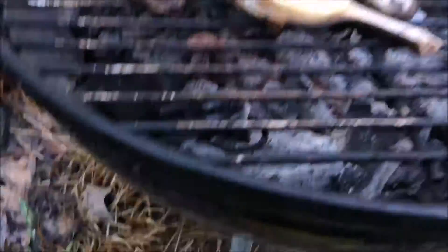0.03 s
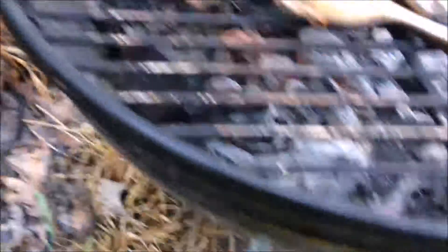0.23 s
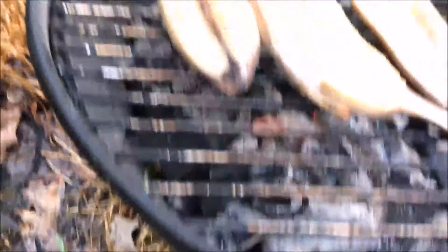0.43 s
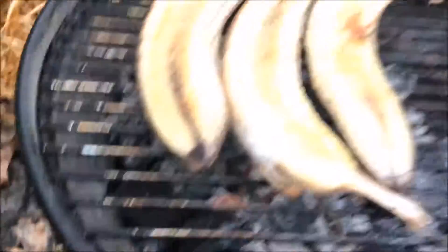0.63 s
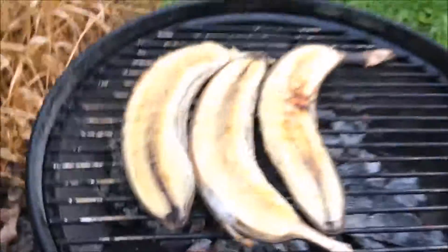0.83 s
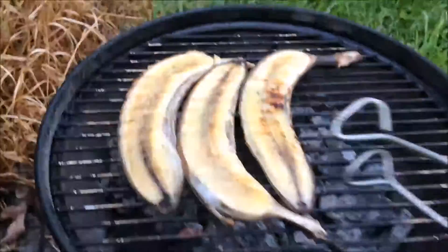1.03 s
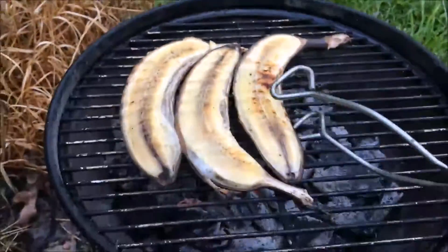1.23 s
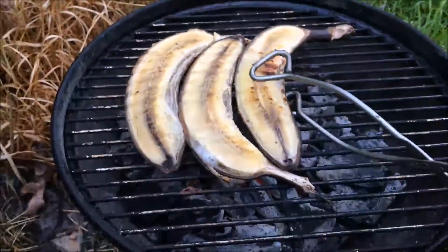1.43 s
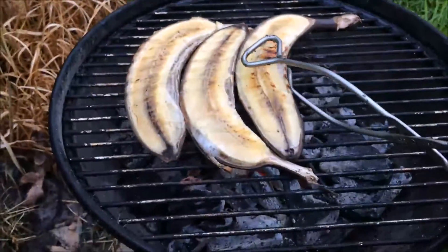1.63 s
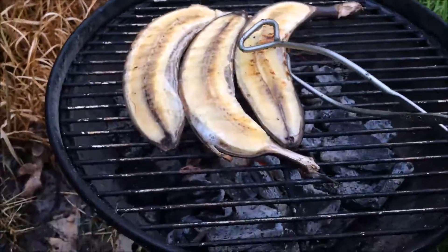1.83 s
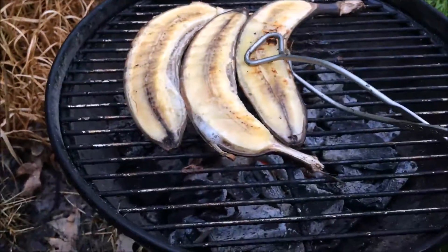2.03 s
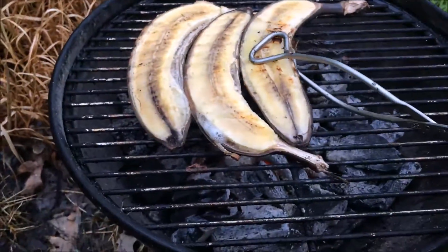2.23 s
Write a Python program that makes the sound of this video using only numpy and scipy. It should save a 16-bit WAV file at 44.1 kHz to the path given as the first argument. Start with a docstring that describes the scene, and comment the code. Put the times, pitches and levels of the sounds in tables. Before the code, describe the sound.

Wire tongs tick twice and snap shut with a loud bright jangle; about a second later they knock the metal grate softly and scrape along its bars, over faint fruit sizzle and low outdoor rumble, close microphone.

```python
"""Tongs at a charcoal grill

Wire tongs tick twice and snap shut with a bright ring, made of many fading sine waves and a noise crack.
Later they knock the grate four times, the last two faintly, and drag along its bars: noise through resonances.
Fruit sizzles, pops and spits (short sines and noise bursts) over a low outdoor rumble of coloured noise.
The recorder turns itself down for a moment after the loud snap.
"""
import sys
import numpy as np
from scipy import signal
from scipy.fft import rfft, irfft, next_fast_len
from scipy.io import wavfile
from scipy.ndimage import uniform_filter1d, map_coordinates

SR = 44100
rng = np.random.default_rng(int(sys.argv[2]) if len(sys.argv) > 2 else 0)


def put_to_file(sound):
    """Save the sound as 16-bit audio at rate SR, in the file named by the first command-line argument."""
    columns = np.atleast_2d(sound).T  # one column per channel
    safe = np.clip(columns, -1, 1)
    whole_steps = np.round(safe * 32767)
    wavfile.write(sys.argv[1], SR, whole_steps.astype(np.int16))


N = 101430
TIME = np.arange(N) / SR  # s

# In all names, T60 is the time to fade by 60 dB. Table levels are relative unless a function sets them.
# Pitches at which the tong wire rings: f/Hz
WIRE_PITCHES = [668, 725, 975, 1078, 1204, 1306, 1567, 1667, 1875, 2038, 2348, 2456, 2981, 3666, 3741, 3836,
                4271, 4312, 4958, 5440, 6032, 6685, 6766, 7063, 7768, 8038, 8098, 9303, 10860, 11550, 12420,
                14100]
# Each of those modes in the same order, before the extra treble fading: level/dB, t60/s
WIRE_MODES = [(-15.5, 0.06), (-14, 0.056), (-13, 0.18), (-20, .16), (-5.5, .03), (-6, 0.034), (-12.5, 0.22),
              (-15.5, 0.16), (-19.5, 0.1), (-3, 0.084), (-17, 0.06), (-20, 0.23), (-11, .12), (-14.5, 0.14),
              (-15, .14), (-18, 0.17), (-2.5, 0.048), (-4, 0.14), (-16.5, 0.03), (-5, 0.068), (-14.5, 0.09),
              (-14.5, .09), (-9.5, 0.18), (-6.5, 0.12), (-17.5, .066), (-19, 0.1), (-8, 0.12), (-11.5, 0.1),
              (-10, 0.065), (-15, 0.1), (-18.5, .075), (-16, .062)]
# Colour of the many weak wire modes and of the crack: f/Hz, level/dB
CLATTER_COLOUR = [(400, -40), (850, -25.5), (1300, -8), (2600, -11.5), (4500, -10), (9000, -8.5),
                  (15500, -23)]
# Typical fading time of the weak modes, before the extra treble fading: f/Hz, t60/s
CLATTER_FADE = [(1500, .05), (4000, 0.1), (14000, 0.07)]
# Damped first contacts of the jaws: t/s, level/dB, t60/s, rise/s
JAW_TICKS = [(.2417, -13, .012, .0003), (.2453, -5, .008, .0005)]
# Resonances of the jaws in those ticks: f/Hz, width/Hz, level/dB
JAW_RESONANCES = [(680, 90, 6), (1880, 450, -13), (3650, 400, 0), (8200, 1100, -10.5), (13000, 5000, -20.5)]
# Knocks on the grate: t/s, chatter level/dB, rise/s, t60/s, brightness/dB, thud level/dB
GRATE_KNOCKS = [(1.2907, -27, 0.00067, 0.087, -17, -29.5), (1.3519, -25.5, 0.0015, 0.066, 8, -27.5),
                (1.378, -42, 0.0015, 0.13, 2, -37), (1.456, -47.5, 0.0015, 0.098, -21, -35.5)]
# Course of the drag: t/s, level of the bars' hum/dB, rasp level/dB, rasp pitch f/Hz
DRAG_COURSE = [(1.299, -50.5, -45, 4570), (1.345, -50.5, -46.5, 4650), (1.42, -58.5, -52.5, 5050),
               (1.443, -49, -53, 5000), (1.48, -48.5, -46.5, 4870), (1.503, -53.5, -47, 5060),
               (1.55, -49.5, -55, 4900), (1.58, -56.5, -55.5, 4170), (1.615, -70, -55, 4050),
               (1.656, -55, -52, 3530), (1.7, -67, -59, 3720), (1.75, -68.5, -61.5, 3960),
               (1.8, -79, -67, 3880)]
# Resonances of the grate bars: f/Hz, width/Hz, level/dB
BAR_RESONANCES = [(369, 45.4, -1.5), (420.4, 43.2, -3.5), (911, 57, -2.5), (2000, 66, -2), (2174, 49, 5),
                  (3110, 54, -6.5), (3797, 58, -6), (4254, 80, 4), (4660, 46, 5.5), (5440, 47, -2.5),
                  (7260, 80, -14.5), (9380, 160, -8)]
# Broad colour between those resonances: f/Hz, level/dB
BAR_COLOUR = [(120, -10), (300, -20), (560, -19), (1000, -0.5), (2800, -8), (4600, 5), (15500, -15.5)]
# Louder pops in the sizzle: t/s, level/dB
POP_EVENTS = [(0.836, -32), (2.0611, -41), (2.0915, -39), (2.1813, -42)]
# The two bursts of the spit: t/s, level/dB, t60/s
SPIT_BURSTS = [(.9552, -44, .006), (.9586, -25, .014)]
# Resonances that colour the spit: f/Hz, width/Hz, level/dB
SPIT_RESONANCES = [(5680, 830, -6), (7610, 440, -7), (12030, 1500, -1.5), (14170, 1400, -6.5)]
# Colour of the outdoor rumble and fine hiss: f/Hz, level/dB
AIR_COLOUR = [(25, -17), (75, 2), (125, 3.5), (190, -4.5), (300, -11.5), (760, -15.5), (1410, -11.5),
              (2900, -19), (13500, -28), (15500, -33.5)]

SNAP_S, SNAP_DB = .2573, -9.5  # the jaws meet
RING_RISE_S = .001  # the modes build up while the jaws settle
CLATTER_MODES, CLATTER_DB, CLATTER_SPREAD_DB = 200, -24.5, 5
CRACK_DB, CRACK_T60_S = -15, .006
TREBLE_HOLD_S, TREBLE_HZ, TREBLE_T60_S = .04, 5000, .2  # the ring's treble fades faster soon after the snap
THIN_HZ = 630  # thin wire radiates no bass
THUMP_HZ, THUMP_DB, THUMP_T60_S = 184, -44.5, .1  # the jolt through the handle

THUD_T60_S = .0014  # the push on the bar
HOLD_S = .0053  # the jaw chatters on the bar this long before fading
SPLASH_T60_S = .101  # extra fading of a knock's treble
BAR_COLOUR_DB, HUM_TOP_HZ, BRIGHT_HZ = -12, 640, 6500
SAG_HZ, SAG_DB_PER_S = 392, 25  # the hum above this pitch fades along the drag
RUB_RING, RUB_HISS_DB = .85, -13  # rubbing blunts the resonances and hisses between them
SLIP_DB, PATCHY_DB = 1.5, 4.5  # uneven rub; modes come and go as the contact moves
SQUEAL_DB, SQUEAL_OCTAVES = 6.5, .12  # lift and width around the rasp pitch

GRAINS_PER_S, GRAIN_DB, GRAIN_SPREAD_DB = 960, -51.5, 1.5
GRAIN_HZ, GRAIN_OCTAVES, GRAIN_CYCLES = 8920, .82, 1  # middle pitch, its spread, length of fade
POP_T60_S = .002
AIR_DB = -58.5

DUCK_FROM_DB, DUCK_RATIO, DUCK_AVERAGE_S = -35, .26, .15  # ratio: dB down per dB over
CEILING = .9  # soft overload
ROLL_HZ, ROLL_DB, TOP_HZ = 15100, -26, 16500  # the treble steps down, then ends


def amp(db):
    """Turn dB into a gain."""
    return 10 ** (np.asarray(db) / 20)


def unit(x):
    """Scale to an average (rms) strength of 1."""
    return x / np.sqrt(np.mean(x ** 2) + 1e-20)


def along(points, hz):
    """Read a curve of (f/Hz, value) points, joined by straight lines over log frequency."""
    f, value = np.transpose(points)
    return np.interp(np.log(hz + 1), np.log(f + 1), value)


def filtered(x, response):
    """Multiply the spectrum of x by a response that depends on frequency."""
    m = next_fast_len(N + SR // 2)  # spare room lets the ringing die out
    spectrum = rfft(x, m) * response(np.fft.rfftfreq(m, 1 / SR))
    return irfft(spectrum, m)[..., :N]


def above(edge_hz):
    """Response that passes the sound above an edge and fades below it."""
    return lambda hz: 1 / (1 + (edge_hz / (hz + 1)) ** 6)


def resonances(peaks):
    """Response of objects that ring only after being struck, one peak per mode, with alternating signs."""
    def response(f):
        total = 0
        for k, (center, width, db) in enumerate(peaks):
            peak = 1j * f * width / (center * center - f * f + 1j * f * width)
            total = total + (-1) ** k * amp(db) * peak
        return total
    return response


def noise(colour):
    """Random noise shaped by a colour curve, with rms 1."""
    return unit(filtered(rng.standard_normal(N), lambda hz: amp(along(colour, hz))))


def burst(s, t60, rise=.00011, hold=0):
    """Loudness curve of a hit: rise, hold, exponential fall."""
    t = np.maximum(TIME - s, 0)
    return np.minimum(t / rise, 1) * amp(-60 * np.maximum(t - rise - hold, 0) / t60)


def wobble(rate):
    """Smooth random curve with this many random points a second."""
    points = rng.standard_normal(int(N * rate / SR) + 4)
    return map_coordinates(points, [np.arange(N) * rate / SR])


def blips(s, db, hz, cycles):
    """Add up short sine waves that die within a few cycles."""
    t = np.arange(128) / SR
    fade = np.exp(-t * hz[:, None] / cycles)
    shape = amp(db)[:, None] * np.sin(2 * np.pi * hz[:, None] * t) * fade
    at = np.round(s * SR).astype(int)[:, None] + np.arange(len(t))
    return np.bincount(at.ravel(), shape.ravel(), N + len(t))[:N]


def mode(hz, db, t60):
    """One way the tongs vibrate: a sine wave that starts at the snap and fades."""
    return amp(db) * burst(SNAP_S, t60, RING_RISE_S) * np.sin(2 * np.pi * hz * (TIME - SNAP_S))


def clatter():
    """A crowd of weak wire modes with random pitch, level, phase and fading time."""
    t = np.arange(SR // 4) / SR
    u = rng.random((CLATTER_MODES, 2))
    z = rng.standard_normal((CLATTER_MODES, 2))
    hz, phase = 950 + 14200 * u[:, :1], u[:, 1:]
    t60 = along(CLATTER_FADE, hz) * np.exp(.21 * z[:, 1:])
    start_db = CLATTER_DB + along(CLATTER_COLOUR, hz) + CLATTER_SPREAD_DB * z[:, :1]
    waves = amp(start_db - 60 * t / t60) * np.sin(2 * np.pi * (hz * t + phase))
    return waves.sum(axis=0)


def tongs():
    """Two damped ticks shake the jaws; the snap then cracks and sets the wire ringing in many modes."""
    ring = np.zeros(N)
    for hz, (db, t60) in zip(WIRE_PITCHES, WIRE_MODES):
        ring += mode(hz, SNAP_DB + db, t60) * rng.choice([-1, 1])
    weak = clatter()
    ring[round(SNAP_S * SR):][:len(weak)] += weak
    treble = filtered(ring, above(TREBLE_HZ))
    ring += treble * (burst(SNAP_S, TREBLE_T60_S, hold=TREBLE_HOLD_S) - 1)  # swap in the faster-fading treble

    crack = amp(CRACK_DB) * burst(SNAP_S, CRACK_T60_S, hold=.001) * noise(CLATTER_COLOUR)
    contacts = sum(amp(db) * burst(s, t60, rise) for s, db, t60, rise in JAW_TICKS)
    shake = contacts * (rng.standard_normal(N) + .15)  # rattle and push
    ticks = filtered(shake, resonances(JAW_RESONANCES)) * amp(8.5)
    no_bass = signal.butter(10, THIN_HZ, 'high', fs=SR, output='sos')
    thin = signal.sosfilt(no_bass, ring + crack + ticks)
    return thin + mode(THUMP_HZ, THUMP_DB, THUMP_T60_S)


def bars(hz):
    """Grate bars ring at their own pitches."""
    return resonances(BAR_RESONANCES)(hz)


def body(hz):
    """The ringing bars plus a broad colour between their pitches."""
    return bars(hz) + amp(BAR_COLOUR_DB + along(BAR_COLOUR, hz))


def knocks():
    """Each knock pushes on the bars and chatters on them, with its treble fading faster."""
    scale = 1 / np.std(filtered(rng.standard_normal(N), body))
    treble = above(BRIGHT_HZ)
    out = np.zeros(N)
    for s, db, rise, t60, bright_db, thud_db in GRATE_KNOCKS:
        push = amp(thud_db + 12) * burst(s, THUD_T60_S, THUD_T60_S / 2)
        shake = amp(db + 2.8 * wobble(400)) * burst(s, t60, rise, HOLD_S) * rng.standard_normal(N)
        splash = shake * burst(s, SPLASH_T60_S) * amp(bright_db + 3)
        out += scale * filtered(push, bars)
        out += scale * filtered(shake, lambda hz: body(hz) * (1 - treble(hz)))
        out += scale * filtered(splash, lambda hz: body(hz) * treble(hz))
    return out


def drag():
    """Rubbing makes the bars hum and rasp, with a rasp pitch that moves with the contact."""
    s, hum_db, rasp_db, pitch_hz = np.transpose(DRAG_COURSE)

    def low(hz):
        return 1 / (1 + (hz / HUM_TOP_HZ) ** 6)

    def level(db):
        return amp(np.interp(TIME, s, db, -120, -120) + 1.5 * wobble(60))

    def rubbed(hz):
        blunted = np.abs(body(hz)) ** RUB_RING + amp(RUB_HISS_DB)
        return blunted * (1 - low(hz)) / (1 + (hz / BRIGHT_HZ) ** 2)

    source = rng.standard_normal(N)
    upper = filtered(source, lambda hz: body(hz) * low(hz) * (hz > SAG_HZ))
    lower = filtered(source, lambda hz: body(hz) * low(hz) * (hz <= SAG_HZ))
    hum = unit(lower) + unit(upper) * amp(-SAG_DB_PER_S * np.maximum(TIME - s[0], 0))

    slips = rng.standard_normal(N) * amp(SLIP_DB * wobble(300))
    hz, t, z = signal.stft(filtered(slips, rubbed), SR, nperseg=1024)  # sound as frequency by time
    patches = unit(uniform_filter1d(rng.standard_normal(z.shape), size=6, axis=1))
    octaves_off = np.log2((hz[:, None] + 1) / np.interp(t, s, pitch_hz))
    lift = np.exp(-(octaves_off / SQUEAL_OCTAVES) ** 2)
    z = z * amp(SQUEAL_DB * lift + PATCHY_DB * patches)
    rasp = unit(signal.istft(z, SR, nperseg=1024)[1][:N])
    return hum * level(hum_db) + rasp * level(rasp_db)


def sizzle():
    """Tiny bursting bubbles come in clumps as short sines; pops and one spit are bursts of noise."""
    u = rng.random((int(GRAINS_PER_S * N / SR), 2))
    hz = GRAIN_HZ * 2 ** (GRAIN_OCTAVES * rng.standard_normal(len(u)))
    hz = np.clip(hz, 800, SR / 3)
    db = GRAIN_DB - GRAIN_SPREAD_DB * np.log(u[:, 1])  # a few bubbles are much louder
    grains = blips(u[:, 0] * N / SR, db, hz, GRAIN_CYCLES) * amp(4 * wobble(17.24))

    pop_shape = sum(amp(db - 4) * burst(s, POP_T60_S) for s, db in POP_EVENTS)
    pops = pop_shape * noise([(500, -43), (1300, -8), (15000, -5.5)])  # f/Hz, level/dB
    spit = sum(amp(db) * burst(s, t60) for s, db, t60 in SPIT_BURSTS) * rng.standard_normal(N)
    return grains + pops + filtered(spit, resonances(SPIT_RESONANCES)) * amp(5.5)


def air():
    """Outdoor rumble and the fine hiss of the grill: coloured noise with a slightly fluttering level."""
    flutter_db = .7 * wobble(8) + 1.2 * wobble(40)
    return amp(AIR_DB + flutter_db) * noise(AIR_COLOUR)


def scene():
    """Add all sources at one microphone."""
    return (tongs() + knocks() + drag() + sizzle() + air())[None]


def record(dry):
    """Turn down while the averaged power is high, round off loud peaks, then limit the treble."""
    keep = np.exp(-1 / (DUCK_AVERAGE_S * SR))
    power = signal.lfilter([1 - keep], [1, -keep], dry ** 2)
    over_db = np.maximum(10 * np.log10(power + 1e-12) - DUCK_FROM_DB, 0)
    ducked = dry * amp(-DUCK_RATIO * over_db)
    wet = ducked / (1 + (dry / CEILING) ** 4) ** (1 / 4)

    def band_limit(hz):
        return amp(ROLL_DB * np.clip((hz - ROLL_HZ) / 400, 0, 1)) * (hz < TOP_HZ)

    return filtered(wet, band_limit)


dry = scene()
out = record(dry)
put_to_file(out)
```